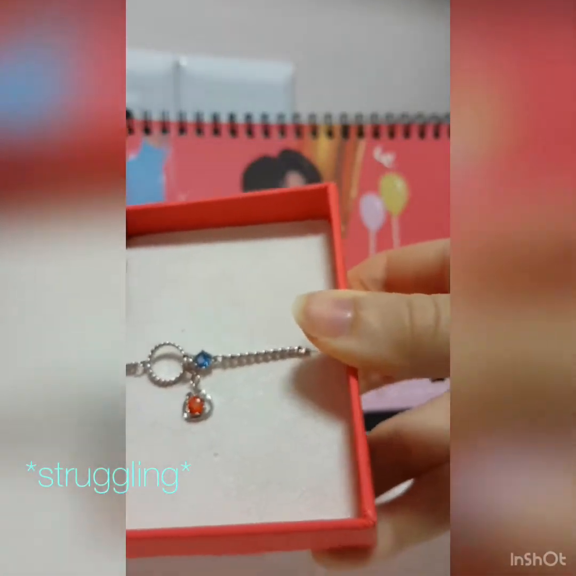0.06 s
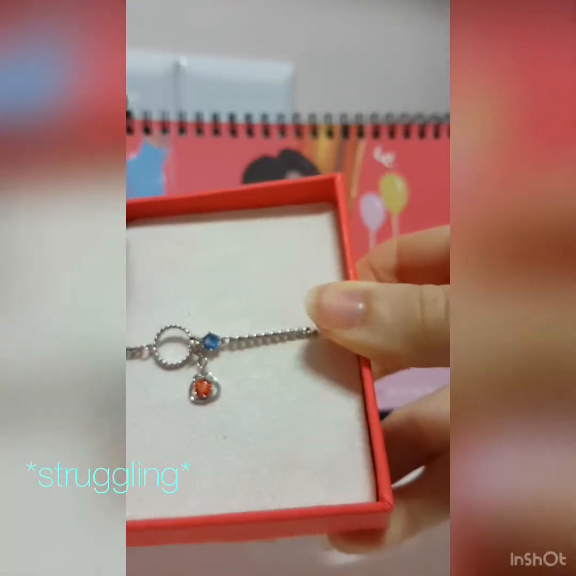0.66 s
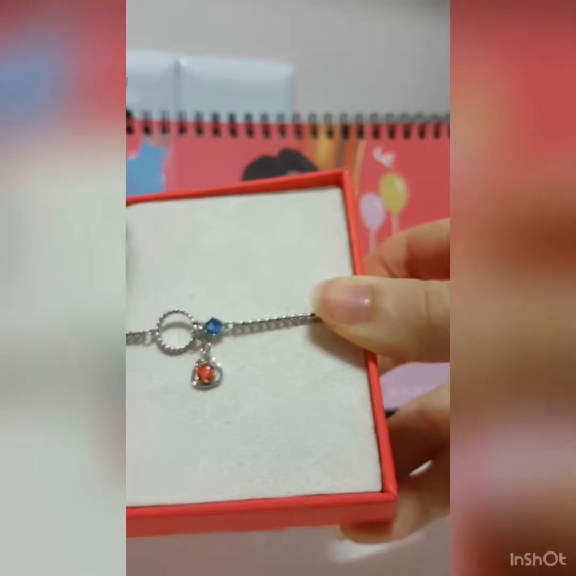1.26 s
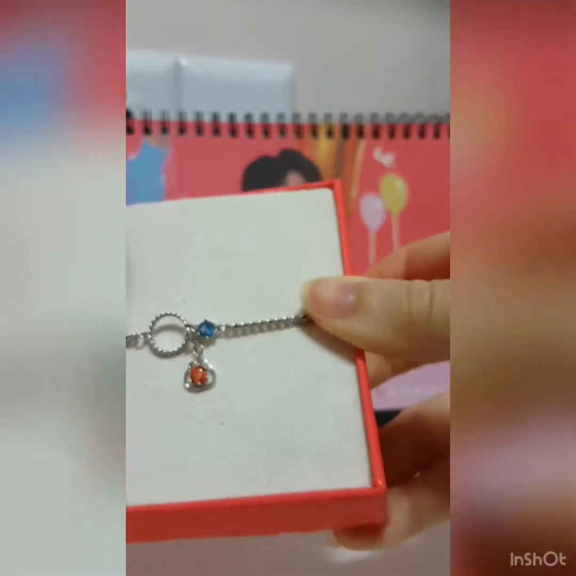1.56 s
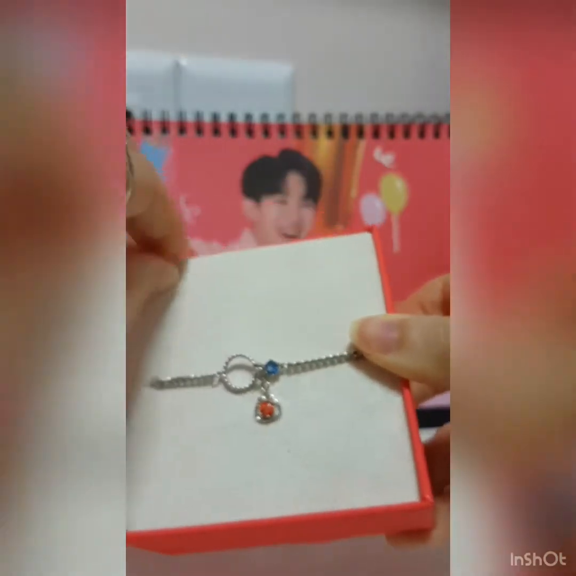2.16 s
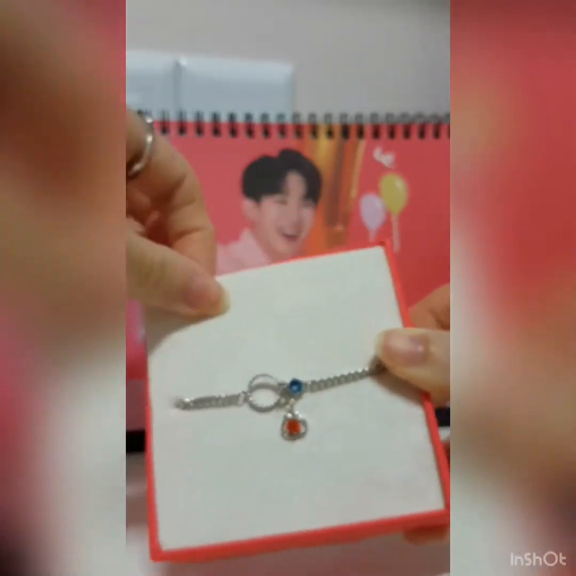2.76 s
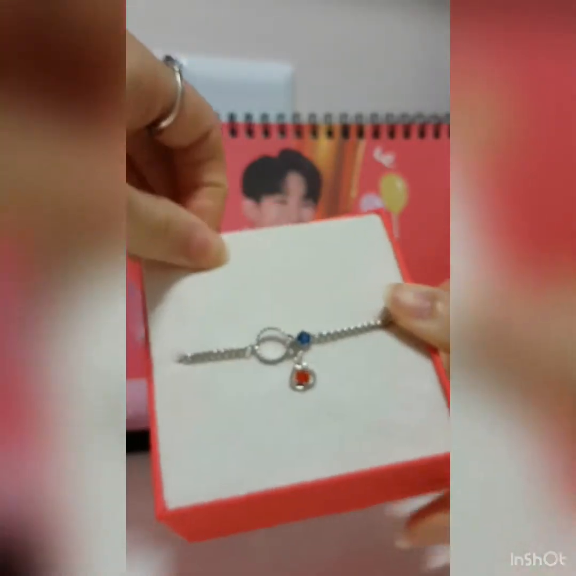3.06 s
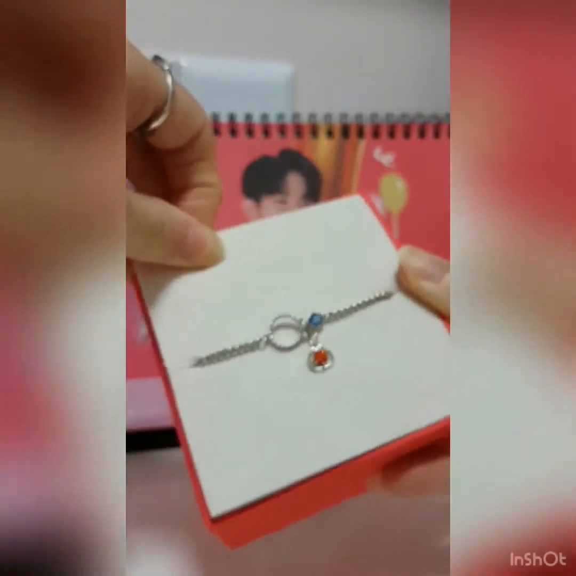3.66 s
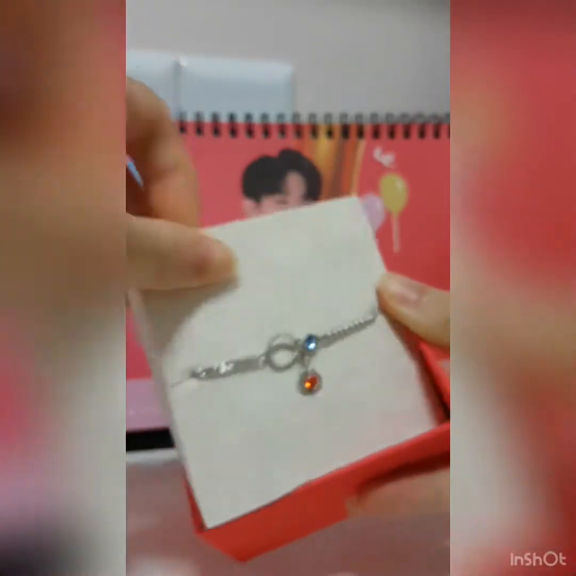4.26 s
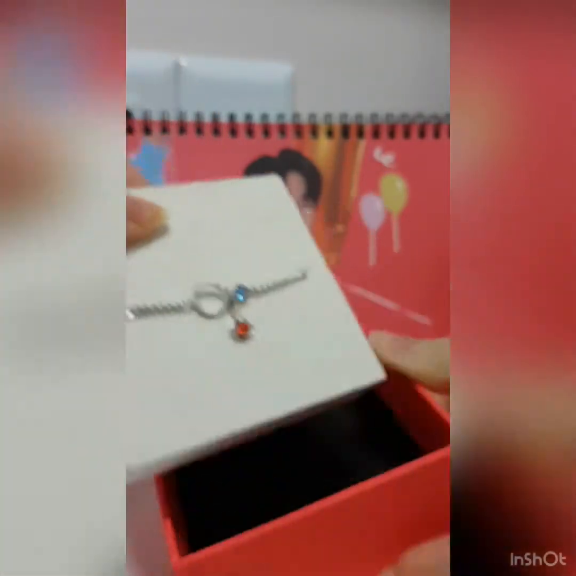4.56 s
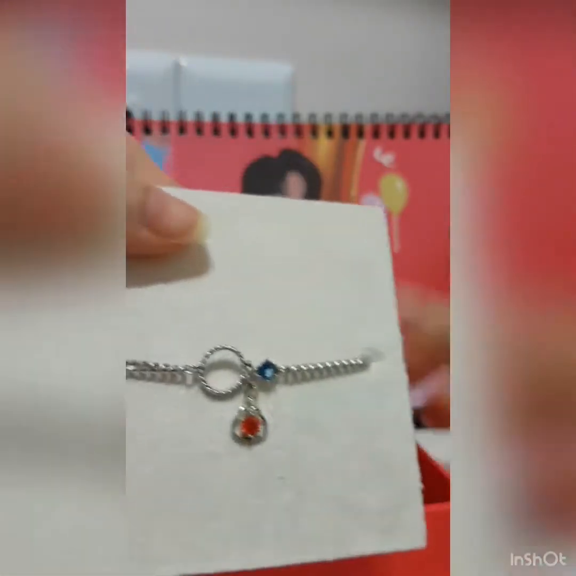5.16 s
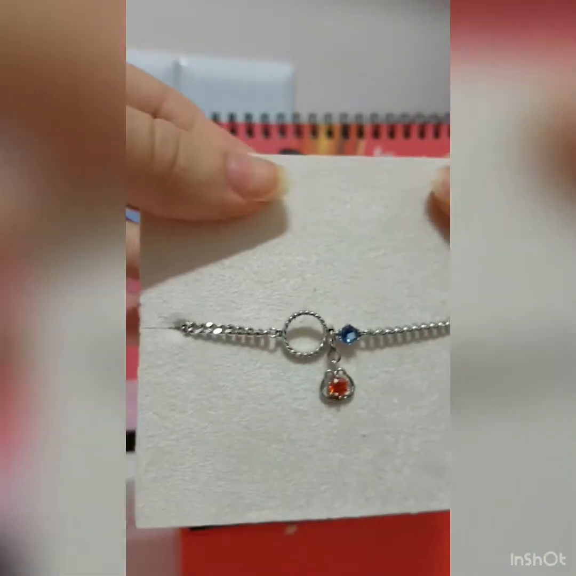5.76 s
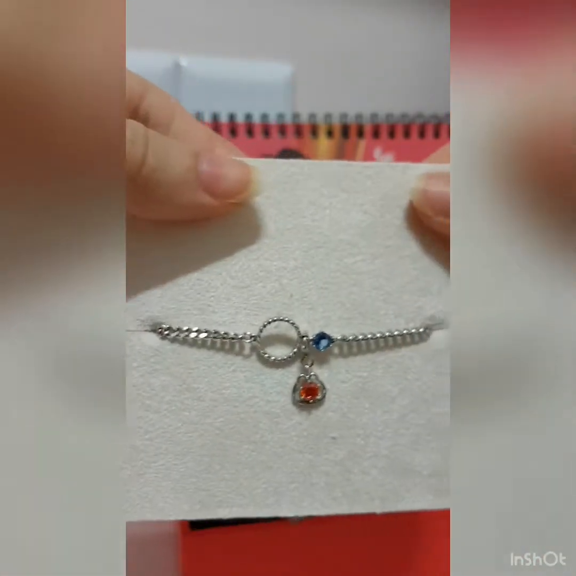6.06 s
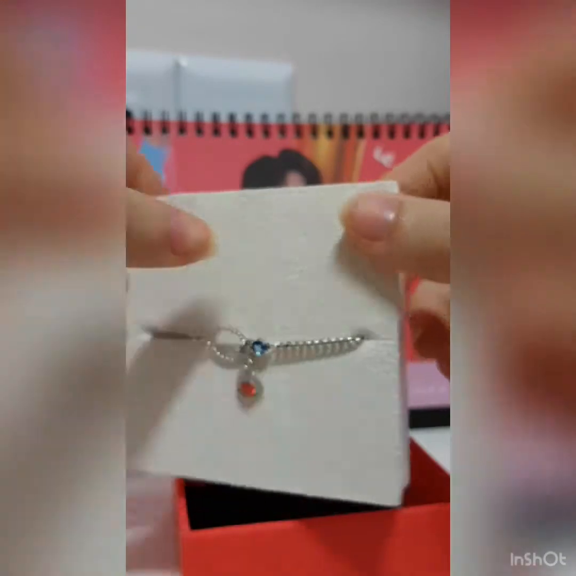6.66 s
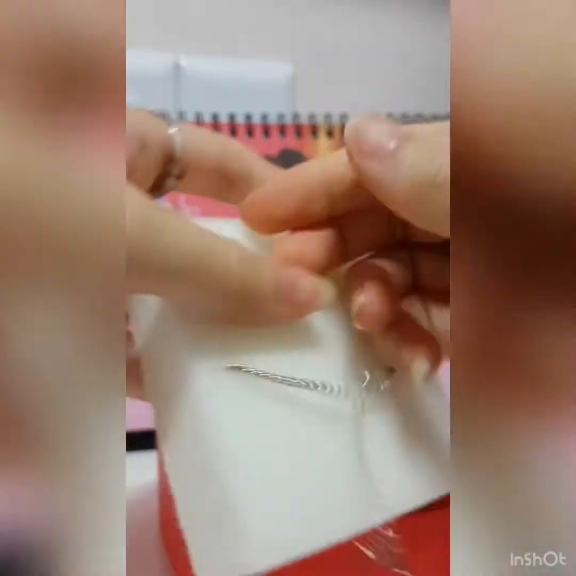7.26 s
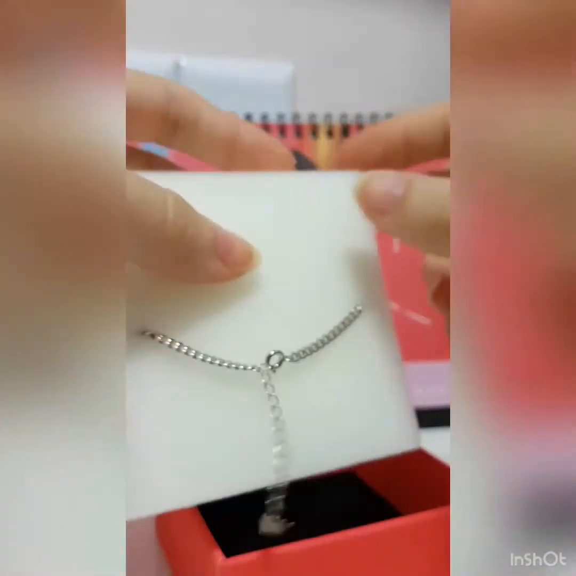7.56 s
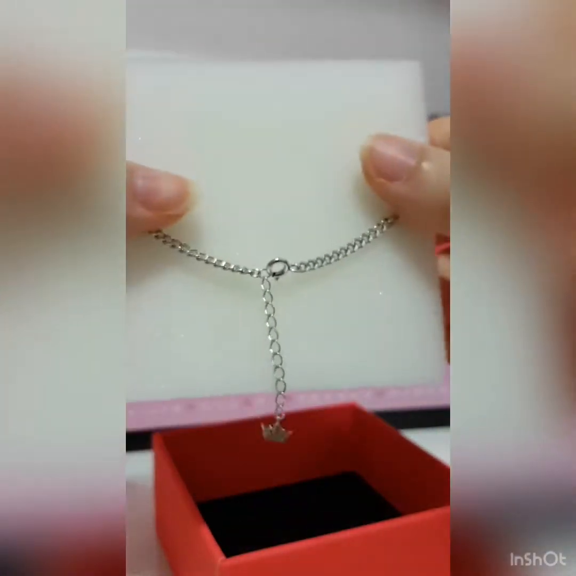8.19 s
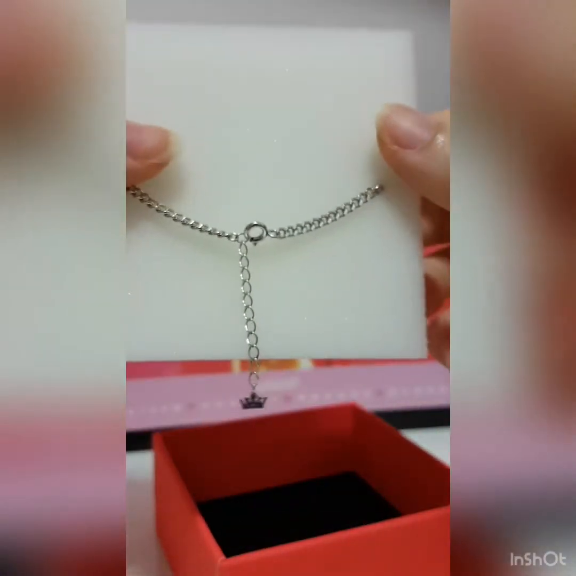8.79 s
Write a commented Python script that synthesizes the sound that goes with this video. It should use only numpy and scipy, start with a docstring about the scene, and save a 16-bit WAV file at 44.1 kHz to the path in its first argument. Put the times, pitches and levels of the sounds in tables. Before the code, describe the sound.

Fingers handle a small cardboard jewellery box close to a stereo microphone, in a small quiet room with faint steady hiss and hum. For the first 4.5 seconds, a padded card insert rubs and scrapes softly against the box walls in short, uneven strokes, mixed with light fingertip ticks and a few tiny squeaks. A soft bump comes near 1.9 seconds, and a longer rub runs from about 3 to 4 seconds. Between 4.6 and 5 seconds the empty box knocks on the desk three times, short and hollow, the loudest sounds. From 5.3 to 6.2 seconds the insert gives several sharp, dry clicks as it is gripped, with weaker ones until 6.5. Light sliding follows, then a cluster of softer bumps and scuffs around 7.2 seconds. A few faint rubs trail off by about 8.4 seconds.

```python
"""Fingers work a padded card insert out of a small cardboard jewellery box in a quiet room.
At first the card rubs and ticks against the walls, with a soft bump near 1.9 s. From 4.6 to 5 s
the empty box knocks on the desk three times: its walls ring and the air inside booms. Then the
insert clicks sharply as it is gripped and turned over. Softer bumps follow near 7.2 s, and a few
last rubs. Two microphones in a nearby phone, left and right, hear it all slightly apart."""
import sys
import numpy as np
from scipy import signal
from scipy.fft import rfft, irfft
from scipy.io import wavfile
from scipy.ndimage import uniform_filter1d

SR = 44100
rng = np.random.default_rng(int(sys.argv[2]) if len(sys.argv) > 2 else 0)


def bounce(signal):
    """Save signal as a 16-bit WAV file at the path given by the first command-line argument."""
    frames = np.transpose(np.atleast_2d(signal))
    limited = np.clip(frames, -1, 1)
    pcm = np.round(limited * 32767).astype(np.int16)
    wavfile.write(sys.argv[1], SR, pcm)


N = 389299

# Levels in the tables are relative. A t60 is the time a sound takes to fade by 60 dB.
# knocks of the box: t/s, boom level/dB, wall level/dB, treble cut-off f/Hz, right microphone lag/ms
BOX_KNOCKS = [(1.8649, -53, -55.5, 9300, 0.092), (4.566, -32.5, -26.5, 1380, 0.14),
              (4.5733, -32.5, -36, 1090, 0.091), (4.6084, -43, -48.5, 1210, 0.14),
              (4.741, -32, -21, 2200, 0.31), (4.7502, -32, -28.5, 1685, 0.24),
              (4.7659, -37, -38.5, 1580, 0.31), (5.0236, -31.5, -28, 9200, 0.25),
              (5.0262, -36.5, -27, 800, 0.34), (5.0339, -43, -39.5, 690, 0.21),
              (7.1750, -46, -46, 1000, 0.21), (7.1850, -47.5, -42.5, 2370, 0.27),
              (7.1980, -46.5, -52, 900, 0.38), (7.247, -52, -45, 2140, 0.38)]
# ringing tones of the air and floor of the box: f/Hz, level/dB, t60/s
CAVITY_TONES = [(152, -19, 0.15), (310, -19.5, 0.05), (356, -7, 0.057), (424.5, 5.5, 0.072),
                (495, -7, 0.07), (573, 2, 0.032), (625, -3.5, 0.035)]
# ringing tones of its stiff walls: f/Hz, level/dB, t60/s
WALL_TONES = [(627, 7, 0.028), (903, -7, 0.072), (1030, -0.5, 0.076), (1187, -9, 0.058), (1327, 0.5, 0.039),
              (1406, -1.5, 0.05), (1460, 3.5, 0.052), (1673, 3.5, 0.025), (1770, -7.5, 0.027),
              (1986, -4.5, 0.036), (2670, -2, 0.021), (2730, 0, 0.029), (2920, -22, 0.015),
              (4480, -3.5, 0.021), (6410, 6, 0.014), (7540, -17, 0.013), (11000, -25, 0.0064)]
# crunch of the cardboard where it is hit: f/Hz, level/dB
CRUNCH_COLOUR = [(190, -22.5), (290, -7), (450, -2), (620, 1.5), (780, -1), (1100, 0.5), (1550, 3.5),
                 (1970, -1), (2250, -7.5), (2850, -3), (3600, -10), (4700, -10.5), (5500, -12.5),
                 (7000, -8), (9000, -16.5), (15000, -9)]
# sharp clicks of the insert: t/s, level/dB, treble cut-off f/Hz
INSERT_CLICKS = [(0.166, -47.5, 11900), (5.33, -36.5, 7000), (5.3387, -34, 13000), (5.3415, -36.5, 12500),
                 (5.352, -44.5, 11000), (5.6003, -35.5, 11000), (5.6025, -33, 13100), (5.6718, -36.5, 7200),
                 (5.6916, -45, 6030), (5.8873, -39.5, 5300), (5.9194, -40.5, 9600), (6.0570, -56, 4000),
                 (6.1706, -39, 8000), (6.254, -58, 3500), (6.3837, -58, 7000), (6.4563, -50.5, 3300),
                 (6.476, -54.5, 6350), (7.217, -55, 3500), (7.231, -59, 3500)]
# ringing tones of the insert: f/Hz, level/dB, t60/s
INSERT_TONES = [(673, -20.5, 0.092), (910, -3, 0.021), (1490, -3, 0.02), (1840, -22, 0.012),
                (2260, -30, .02), (2663, 4, 0.038), (2820, -9, 0.041), (3580, -12, 0.028),
                (4730, -10.5, 0.025), (5980, -9, 0.016), (7170, -28, 0.015), (8280, -24, 0.021),
                (9800, 5.5, 0.0012), (11300, -27.5, .008)]
# its dry snap: f/Hz, level/dB
SNAP_COLOUR = [(200, -26.5), (650, -2.5), (1150, -13.5), (1620, 3.5), (2000, 1), (2480, -5.5), (2770, 9.5),
               (3150, -1.5), (3900, -14), (5400, -12.5), (6600, -0.5), (8500, -8.5), (12000, -12),
               (15500, -14)]
# fingertips and card edges catch on the walls: t/s, level/dB, treble cut-off f/Hz
FINGER_TICKS = [(.008, -53.5, 2500), (.1510, -50.5, 2600), (.4080, -57.5, 2000), (0.9356, -46.5, 2580),
                (1.0712, -55, 2890), (1.392, -52, 990), (1.8655, -54, 15000), (2.046, -58.5, 1500),
                (2.2100, -58.5, 9000), (2.3866, -56, 13000), (2.4500, -59.5, 2500), (2.7721, -55.5, 5000),
                (2.9266, -47.5, 11500), (2.9291, -46, 850), (3.3741, -55, 1300), (3.4202, -57, 1800),
                (3.5809, -55, 1400), (3.9500, -63, 6980), (4.055, -56.5, 6500), (4.0735, -55.5, 7000),
                (4.087, -57, 6000), (4.163, -59.5, 15000), (4.2808, -48, 2600), (4.318, -56.5, 9900),
                (4.38, -55, 3000), (6.6747, -53.5, 900), (7.313, -50.5, 2000), (7.3550, -53, 1980),
                (7.3696, -49.5, 1900), (7.7492, -54.5, 14000)]
# scuff of a fingertip on the held box: f/Hz, level/dB
SCUFF_COLOUR = [(150, -12), (400, -5.5), (650, 2), (1000, 8), (1220, -21.5), (1600, 3), (2100, -3.5),
                (2800, -8.5), (3900, -17), (4900, -10.5), (5800, -9), (7000, -7), (9000, -9.5),
                (15000, -9.5)]
# the padded insert bumps against the hand: t/s, level/dB
PAD_THUDS = [(1.8666, -46.5), (7.175, -63), (7.194, -46.5), (7.249, -56)]
# dull tones of the bending pad: f/Hz, level/dB, t60/s
PAD_TONES = [(135, 0, 0.052), (183, 0.5, 0.044), (248.5, -2.5, 0.22), (313, -6, 0.12), (934, 0.5, 0.084)]
# a tight card edge lets go with a squeak: t/s, level/dB, f/Hz
EDGE_SQUEAKS = [(0.165, -58, 3800), (0.168, -51, 6700), (1.864, -51, 6100), (2.927, -62, 7200)]
# card and skin slide along the box: start t/s, length/s, rasp level/dB, hiss level/dB
SLIDE_STROKES = [(0, 0.12, -61, -70.5), (0.108, 0.13, -63, -60.5), (0.307, 0.16, -59, -71),
                 (0.568, 0.087, -61, -75), (0.868, 0.058, -56, -63.5), (0.956, 0.087, -60.5, -76),
                 (1.103, 0.095, -60, -71.5), (1.296, 0.072, -56.5, -63), (1.383, 0.081, -63, -73),
                 (1.595, 0.041, -62.5, -78), (2.37, 0.048, -59, -71), (2.538, 0.031, -56.5, -70),
                 (2.763, 0.038, -62, -65), (2.916, 0.1, -56, -73), (3.07, 0.97, -67, -77.5),
                 (3.631, 0.32, -59, -66.5), (4.115, 0.25, -58, -71), (4.234, .08, -68, -62),
                 (6.51, 0.5, -67.5, -75.5), (7.065, 0.072, -58, -65), (7.11, 0.033, -59, -56),
                 (7.17, 0.1, -58, -60), (7.239, 0.25, -67.5, -68.5), (7.692, 0.084, -64.5, -71.5),
                 (7.846, .05, -68, -69.5), (8.302, 0.11, -69, -75)]
# rasp of the cardboard: f/Hz, level/dB
RASP_COLOUR = [(250, -22.5), (450, 3), (680, -1.5), (830, 1.5), (1000, 8), (1200, -10), (1550, -0.5),
               (2100, -25), (2800, -17.5), (3800, -24), (7000, -34)]
# hiss of its fine fibres: f/Hz, level/dB
HISS_COLOUR = [(1200, -22), (2000, 4.5), (2900, -3.5), (3800, -5.5), (4700, -9), (5500, -1.5), (6800, -2),
               (9000, -4.5), (13000, -10), (15500, -13)]
# ringing tones of the filled, held box when rubbed: f/Hz, level/dB, t60/s
RUBBED_TONES = [(640, -15, 0.026), (946, 2.5, 0.025), (1540, 4, 0.0098), (2760, -10, 0.016)]
# steady background noise: f/Hz, level/dB
AIR_COLOUR = [(20, -15), (49, -14), (130, -5), (165, -15.5), (245, -6.5), (410, -6), (590, -8),
              (1010, -14.5), (2030, -18), (4000, -30), (6300, -31), (9000, -35.5), (13000, -30),
              (15500, -29)]
# how each microphone hears the box and the background: f/Hz, level/dB
BOX_LEFT = [(150, -1), (600, -5.5), (1500, -7), (2400, 1), (4500, 0.2), (8000, -5), (14000, 5.5)]
BOX_RIGHT = [(150, -0.5), (600, 0.5), (1500, 0.5), (2400, -2.5), (4500, 3), (8000, -3.5), (14000, 3)]
AIR_LEFT = [(80, -1), (300, -2.1), (3000, 0.69)]
AIR_RIGHT = [(80, 0.79), (300, 0.07), (3000, 1.1)]

HIT_TIME = np.arange(8192) / SR  # seconds since one short sound began


def box_knocks():
    """Each knock rings the walls and crunches the cardboard; the boom inside takes a moment to swell."""
    out = np.zeros((2, N))
    for start, boom_db, wall_db, cutoff_hz, lag_ms in BOX_KNOCKS:
        walls = ring(WALL_TONES, lag_ms, scatter_db=0.8)
        crunch = level_hit(colour(burst(lag_ms, apart=0.5, t60=0.022), CRUNCH_COLOUR))
        slap = soften((walls + undb(7.5) * crunch) * swell(0.0051), cutoff_hz, order=3)
        boom = soften(ring(CAVITY_TONES, lag_ms, scatter_db=2) * swell(0.038), cutoff_hz)
        add(out, start, undb(wall_db) * slap + undb(boom_db) * boom)
    return room(out, early_db=-7.5, tail_db=-10)


def insert_clicks():
    """The gripped insert gives a quick snap that leaves a short, high ring."""
    out = np.zeros((2, N))
    for start, db, cutoff_hz in INSERT_CLICKS:
        noise = burst(lag_ms=0.17, apart=1, t60=0.024) * swell(0.0055)
        snap = level_hit(colour(noise, SNAP_COLOUR))
        click = ring(INSERT_TONES, lag_ms=0.12, scatter_db=-2.2) + undb(1.5) * snap
        add(out, start, undb(db) * soften(click, cutoff_hz))
    return room(out, early_db=-10, tail_db=-14.5)


def finger_ticks():
    """A fingertip or card edge scuffs the box. The hand stops the boom, so only the walls ring."""
    out = np.zeros((2, N))
    for start, db, cutoff_hz in FINGER_TICKS:
        scuff = level_hit(colour(burst(lag_ms=0.292, apart=0.79, t60=0.0265), SCUFF_COLOUR))
        tick = scuff + undb(-6) * ring(WALL_TONES, lag_ms=0.383, scatter_db=1.5)
        add(out, start, undb(db) * soften(tick, cutoff_hz))
    return room(out, early_db=-7, tail_db=-6)


def insert_bending():
    """The pad thuds as it bends, and its edge squeaks where it slips."""
    out = np.zeros((2, N))
    for start, db in PAD_THUDS:
        add(out, start, undb(db) * ring(PAD_TONES, lag_ms=0.1, scatter_db=1))
    for start, db, hz in EDGE_SQUEAKS:
        band = signal.butter(2, [0.9 * hz, 1.1 * hz], "band", fs=SR, output="sos")
        slip = burst(lag_ms=0.2, apart=0.57, t60=0.016)
        add(out, start, undb(db) * level_hit(signal.sosfilt(band, slip)))
    return room(out, early_db=-12, tail_db=-16.5)


def sliding():
    """Fibres catch and let go in tiny slips, making a rasp and a hiss that grow with the hand's speed."""
    rasp_gain, hiss_gain = np.zeros((2, N))
    for start, length, rasp_db, hiss_db in SLIDE_STROKES:
        speed = stroke_speed(length)
        span = int(start * SR) + np.arange(len(speed))
        # overlapping strokes add their energy
        rasp_gain[span] = np.hypot(rasp_gain[span], undb(rasp_db) * speed ** 0.61)
        hiss_gain[span] = np.hypot(hiss_gain[span], undb(hiss_db) * speed ** 0.84)
    slips = undb(2.6 * wander(hz=900) + wander(hz=140))
    rasp = unit(colour(mic_noise(N, lag_ms=0.29, apart=0.45) * slips, RASP_COLOUR))
    hiss = unit(colour(mic_noise(N, lag_ms=0.42, apart=1) * slips, HISS_COLOUR))
    # the same slips keep the walls ringing faintly
    pushes = rng.standard_normal((1, N)) * slips
    walls = ring(RUBBED_TONES, lag_ms=0.32, scatter_db=2)
    hollow = unit(signal.fftconvolve(pushes, walls, axes=1)[:, :N])
    board = undb(0.5) * rasp + undb(-7.5) * hollow
    return room(board * rasp_gain + undb(1) * hiss * hiss_gain, early_db=-19, tail_db=-3)


def stroke_speed(length, fastest_at=0.46):
    """The hand speeds up smoothly from rest (0) to full speed (1), then slows to rest again."""
    progress = np.linspace(0, 1, int(length * SR))
    return np.sin(np.pi / 2 * np.interp(progress, [0, fastest_at, 1], [0, 1, 0]))


def room(x, early_db, tail_db):
    """The desk and nearby things echo at once; the small room's echo fades behind them."""
    t = np.arange(SR // 2) / SR
    near, low, high = rng.standard_normal((3, 2, len(t)))
    early = near * fade(0.085, t) * (t > 0.003)
    cut_treble = signal.butter(2, 4000, fs=SR)
    low = signal.lfilter(*cut_treble, low) * fade(0.24, t)
    high = (high - signal.lfilter(*cut_treble, high)) * fade(0.23, t)
    tail = (low + 1.33 * high) * np.clip(t / 0.014, 0, 1)
    echoes = (undb(early_db) * unit(early) + undb(tail_db) * unit(tail)) / np.sqrt(len(t))
    return x + signal.fftconvolve(x, echoes, axes=1)[:, :N]


def room_air(hum_hz=58.5):
    """Room noise and microphone hiss over a faint, wavering hum, all a little stronger on the right."""
    air = unit(colour(mic_noise(N, lag_ms=0.248, apart=1), AIR_COLOUR))
    air *= undb(-62.5 + 0.38 * wander(hz=2))
    phase = 2 * np.pi * hum_hz * np.arange(N) / SR + 0.7 * wander(hz=7)
    hum = np.sqrt(2) * np.sin(phase) * undb(-74.5 + 0.6 * wander(hz=9.8))
    return colour_sides(air + hum, AIR_LEFT, AIR_RIGHT)


def ring(tones, lag_ms, scatter_db):
    """A struck thing rings with fading tones; each touch brings them out a little differently."""
    total = np.zeros(len(HIT_TIME))
    for k, (hz, db, t60) in enumerate(tones):
        level_luck, pitch_luck = rng.standard_normal(2)
        wave = np.sin(2 * np.pi * hz * (1 + 0.00087 * pitch_luck) * HIT_TIME)
        total += (-1) ** k * undb(db + scatter_db * level_luck) * fade(t60) * wave
    return level_hit(two_mics(total, lag_ms))


def soften(x, cutoff_hz, order=2):
    """A softer touch pushes for longer and leaves out the treble."""
    return level_hit(signal.sosfilt(signal.butter(order, cutoff_hz, fs=SR, output="sos"), x))


def two_mics(x, lag_ms):
    """A nearby sound reaches the right microphone just after the left."""
    hz = np.fft.rfftfreq(len(x), 1 / SR)
    delay = np.exp(-2j * np.pi * hz * lag_ms / 1000)
    return np.array([x, irfft(rfft(x) * delay, len(x))])


def mic_noise(size, lag_ms, apart):
    """Noise both microphones share; 'apart' sets how much each adds of its own."""
    return two_mics(rng.standard_normal(size), lag_ms) + apart * rng.standard_normal((2, size))


def burst(lag_ms, apart, t60):
    """A puff of noise that dies away."""
    return mic_noise(len(HIT_TIME), lag_ms, apart) * fade(t60)


def colour(x, points):
    """Make low and high pitches louder or softer along a curve of (f/Hz, level/dB) points."""
    hz, db = np.transpose(points)
    grid_hz = np.fft.rfftfreq(2048, 1 / SR)
    gain = undb(np.interp(np.log(grid_hz + 1), np.log(hz), db))
    # folding the cepstrum (the log gain, turned into time) stops the filter from sounding early
    cepstrum = irfft(np.log(gain))
    half = len(cepstrum) // 2
    cepstrum[1:half] *= 2
    cepstrum[half + 1:] = 0
    response = irfft(np.exp(rfft(cepstrum)))
    return signal.fftconvolve(x, response[None], axes=1)[:, :x.shape[1]]


def colour_sides(x, left, right):
    """Give each microphone its own tone colour."""
    return np.vstack([colour(x[:1], left), colour(x[1:], right)])


def wander(hz):
    """A smooth random wobble of size about 1 that turns about hz times a second."""
    step = int(SR / hz)
    targets = rng.standard_normal(N // step + 1)
    return unit(uniform_filter1d(np.repeat(targets, step), step)[:N])


def fade(t60, t=HIT_TIME):
    """Die away by 60 dB every t60 seconds."""
    return np.exp(-np.log(1000) * t / t60)


def swell(seconds):
    """Rise from 0 to almost 1 in this time."""
    return 1 - fade(seconds)


def undb(db):
    """Turn decibels into a number to multiply by."""
    return 10 ** (np.asarray(db) / 20)


def unit(x):
    """Scale to an average strength (rms) of 1."""
    return x / np.sqrt(np.mean(x ** 2))


def level_hit(x):
    """Give a short sound the energy of 10 ms at strength 1."""
    return x / np.sqrt(np.sum(x ** 2) / (2 * SR * 0.01))


def add(out, start, x):
    """Mix in a short sound at 'start' seconds."""
    i = int(start * SR)
    out[:, i:i + x.shape[1]] += x[:, :N - i]


def scene():
    """The handling sounds carry no deep bass; the right microphone hears the box's low notes more strongly."""
    handling = box_knocks() + insert_clicks() + finger_ticks() + insert_bending() + sliding()
    handling = signal.sosfilt(signal.butter(3, 115, "high", fs=SR, output="sos"), handling)
    return colour_sides(handling, BOX_LEFT, BOX_RIGHT) + room_air()


def record(dry):
    """The phone cuts the highest treble."""
    top_hz = 15850
    return signal.sosfilt(signal.ellip(10, 0.2, 70, top_hz, fs=SR, output="sos"), dry)


dry = scene()
out = record(dry)
bounce(out)
```